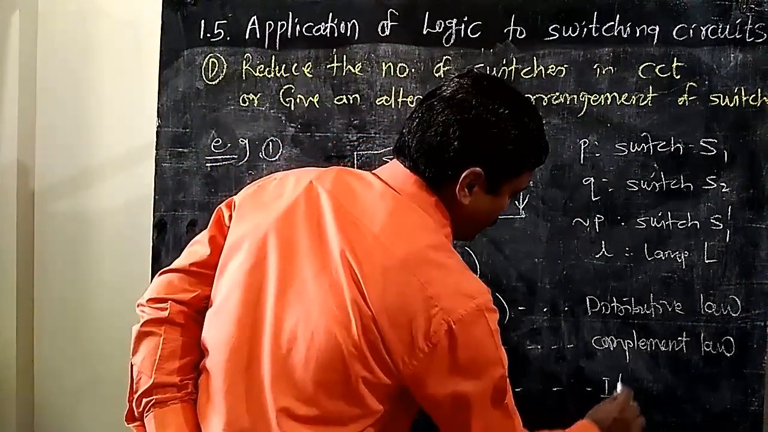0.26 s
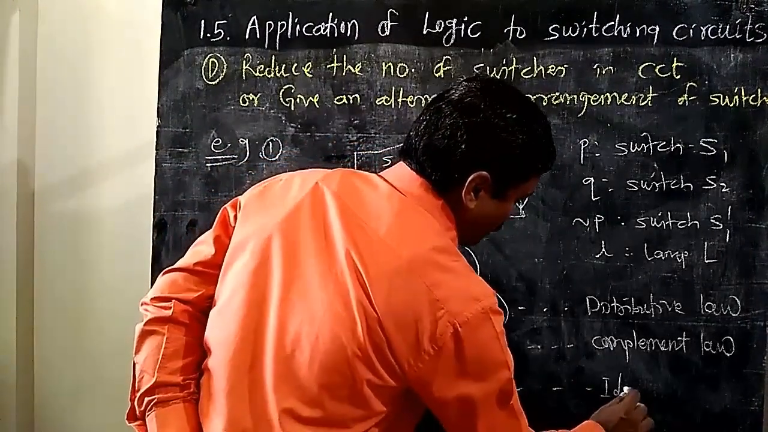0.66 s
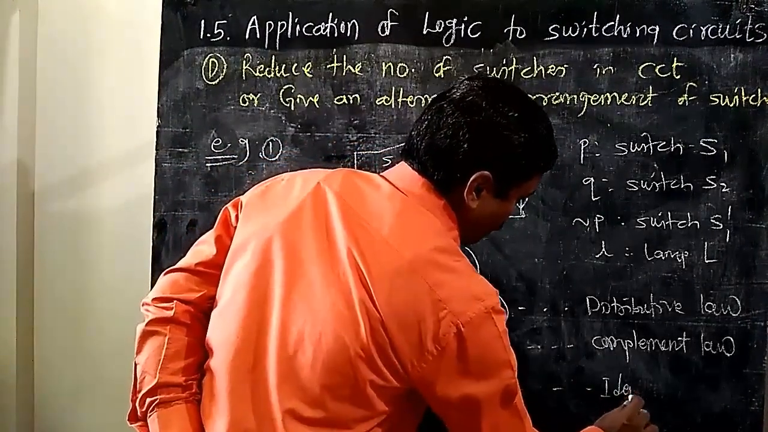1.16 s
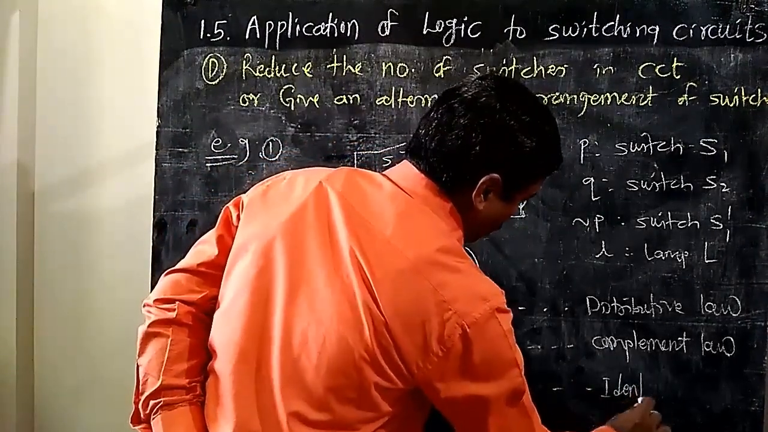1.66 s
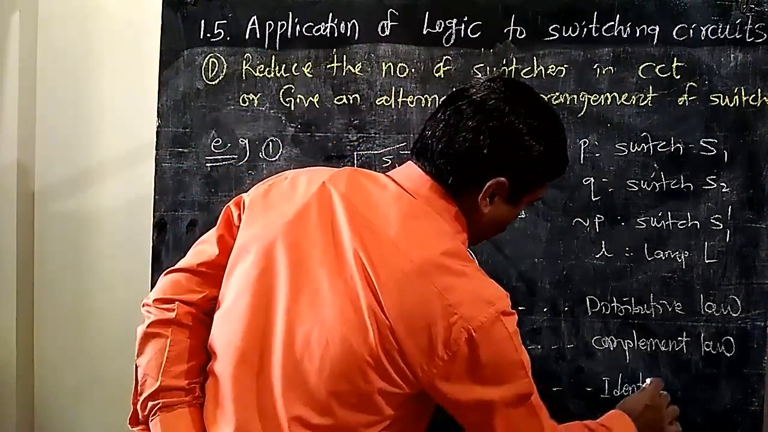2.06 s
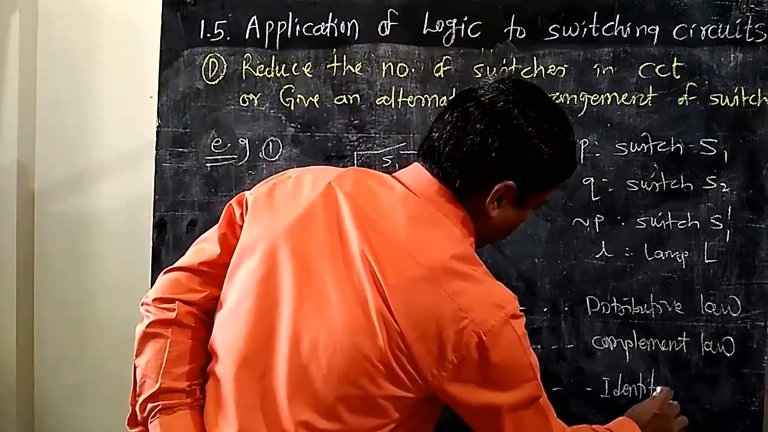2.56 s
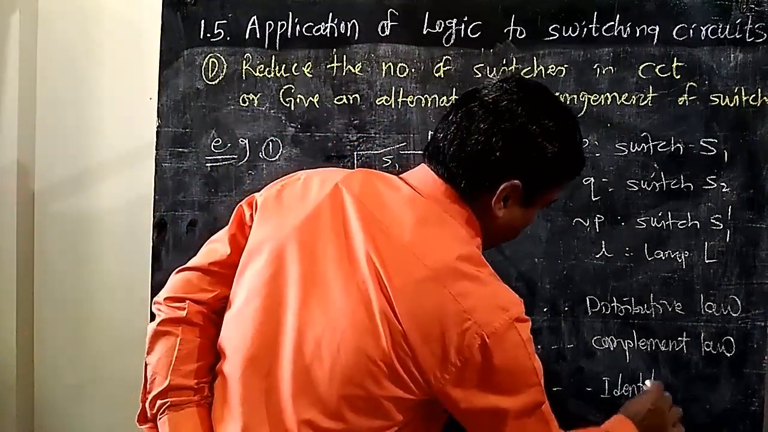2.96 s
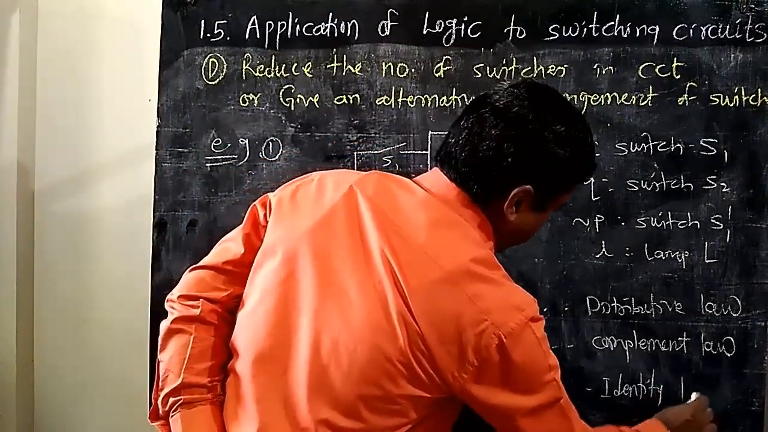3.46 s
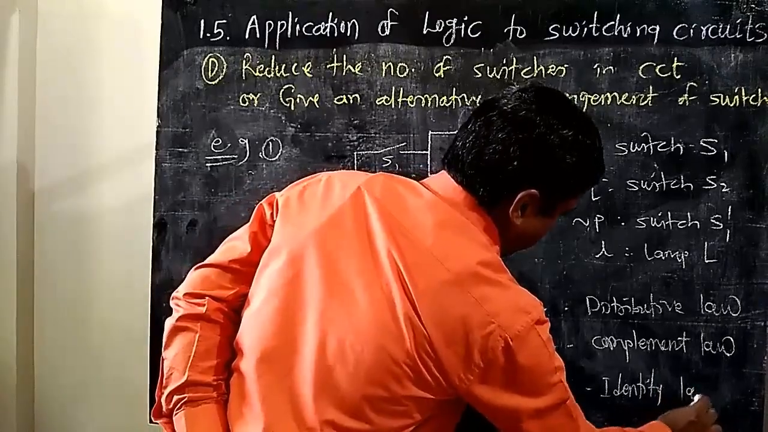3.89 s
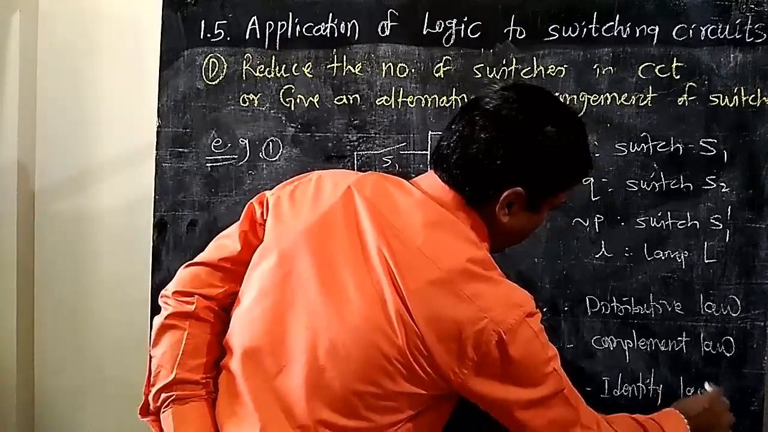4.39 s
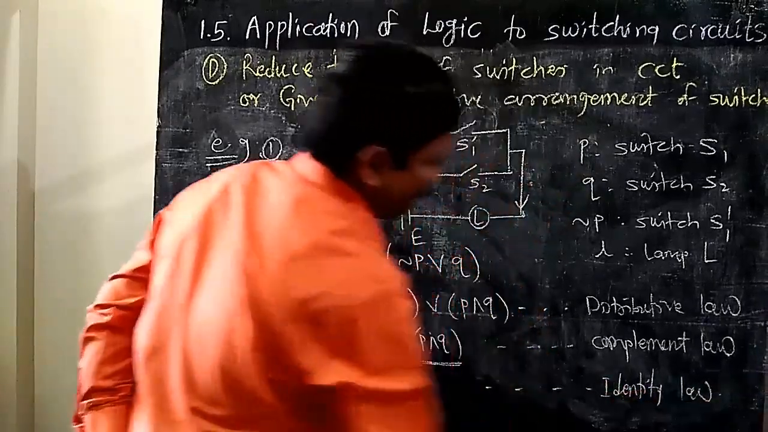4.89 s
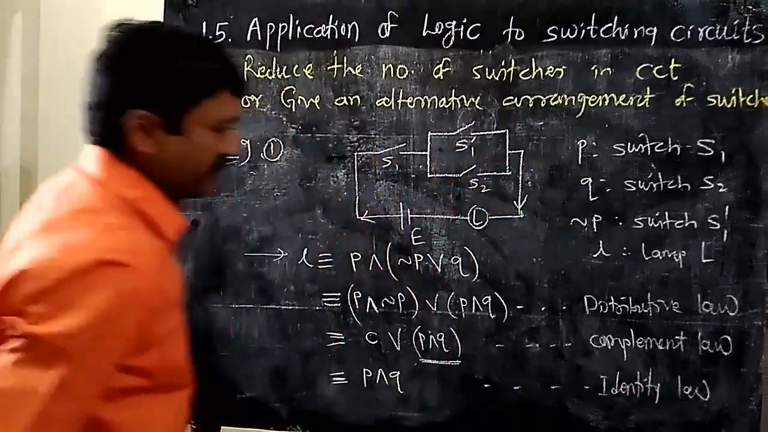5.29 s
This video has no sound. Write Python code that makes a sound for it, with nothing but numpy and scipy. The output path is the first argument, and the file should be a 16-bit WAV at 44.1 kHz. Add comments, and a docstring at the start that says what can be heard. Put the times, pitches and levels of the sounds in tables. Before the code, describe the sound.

In a bare classroom, chalk lands on a blackboard in uneven clusters of sharp taps, many followed by a brief scratchy drag. Between them come faint skims of chalk and the rub of a sleeve. Deep thumps from the flexing board join midway, ending in a quick group of booming knocks against the wall. The sound is mono, with shortened room echoes and faint hiss and electrical hum underneath.

```python
"""A bare, echoing classroom, where chalk writes a few letters on a hanging blackboard.
Each letter starts with a hard tap and a short gritty drag, as the tip sticks and slips.
The board sways under the hand, and knocks and booms against the wall, mostly near the end.
Light chalk glides and a brushing sleeve fill the gaps, over faint hiss and electrical hum.
The sound is mono, and a noise suppressor shortens the echoes."""
import sys
import numpy as np
from scipy import signal
from scipy.fft import irfft
from scipy.io import wavfile
from scipy.ndimage import uniform_filter1d

SR = 44100
rng = np.random.default_rng(int(sys.argv[2]) if len(sys.argv) > 2 else 0)


def wav_out(sig):
    """Save sig, one row per channel (or a flat mono array), as 16-bit PCM at SR to the path in sys.argv[1]."""
    wavfile.write(sys.argv[1], SR, np.round(np.clip(np.atleast_2d(sig).T, -1, 1) * 32767).astype(np.int16))


N = 244269
HZ = np.fft.rfftfreq(8192, 1 / SR)  # the frequencies at which filter curves are drawn
AGE = np.arange(SR * 3 // 4) / SR  # seconds since one short sound began


def gain_of(db):
    """Turns decibels into a factor to multiply by."""
    return 10 ** (np.asarray(db) / 20)


def unit_rms(x):
    """Scales a sound so that its average strength (rms) is 1."""
    return x / np.sqrt(np.mean(x ** 2) + 1e-20)


def at_level(x, db):
    """Scales a sound so that its loudest 50 ms has the level db."""
    return gain_of(db) * x / np.sqrt(uniform_filter1d(x ** 2, 2200).max() + 1e-20)


def curve(points, hz):
    """Joins a table's points to give a value at any frequency."""
    f, value = np.transpose(points)
    return np.interp(np.log(hz + 1), np.log(f + 1), value)


def bump(centre_hz, octaves):
    """A bell-shaped curve around one pitch."""
    return np.exp(-.5 * (np.log2((HZ + 1) / centre_hz) / octaves) ** 2)


def add(mix, s, sound):
    """Mixes a sound in, starting at s seconds."""
    start = round(s * SR)
    sound = sound[max(-start, 0):]
    part = mix[max(start, 0):][:len(sound)]
    part += sound[:len(part)]


def coloured(x, db):
    """Filters a sound by a curve in dB, so that it rings after a blow and never before."""
    log_gain = np.log(gain_of(np.r_[db, db[-2:0:-1]]))
    response = irfft(np.exp(np.conj(signal.hilbert(log_gain)))[:len(HZ)])
    return signal.fftconvolve(x, response[:len(HZ)])[:len(x)]


# The tone of the hiss, from low to high: f/Hz, relative level/dB
HISS_TONE = [(15, -65), (30, -46), (48, -10), (70, -29), (100, -16.5), (135, -9.5), (280, -17),
             (520, -14.5), (950, -13.5), (1400, -18), (3500, -23.5), (6200, -24), (9000, -37.5),
             (12200, -47), (13200, -81)]
def hiss(level_db=-59.5, flicker_db=-2.0):
    """Quiet noise that flickers a little, in small patches of pitch and time."""
    bands = signal.stft(rng.standard_normal(N), SR, nperseg=1024, noverlap=768)[2]
    patches = uniform_filter1d(rng.standard_normal(bands.shape), size=6, axis=0)
    patches = unit_rms(uniform_filter1d(patches, size=10, axis=1))
    noise = signal.istft(bands * gain_of(flicker_db * patches), SR, nperseg=1024, noverlap=768)[1][:N]
    return gain_of(level_db) * unit_rms(coloured(noise, curve(HISS_TONE, HZ)))


# The tones in the electrical hum: f/Hz, level/dB
HUM_TONES = [(50.3, -73.5), (100.5, -68.5), (201, -75), (302, -78.5)]
def hum():
    """Mains electricity hums with a low note and its overtones."""
    t = np.arange(N) / SR
    return sum(gain_of(db) * np.sqrt(2) * np.sin(2 * np.pi * (hz * t + rng.random()))
               for hz, db in HUM_TONES)


# How long the room rings: f/Hz, time to fade by 60 dB (t60)/s
ECHO_TIMES = [(100, .55), (400, 0.39), (1200, 0.43), (3000, 0.43), (4600, 0.33), (5400, 0.47), (7000, 0.45),
              (12000, 0.39)]
# The direct sound, shaded by the writer's body, then the nearest walls: delay/s, strength/ratio to echo
SOUND_PATHS = [(0.0003, 0.14), (0.0062, 0.3), (0.0085, 0.11), (0.017, 0.1), (0.026, 0.082), (0.035, 0.053)]
def room(walls, ring=1.0, firm=0.99, shared=0.42, build_s=0.0089):
    """The room's answer to a click on the board. All spots share the noise `walls`; the rest varies."""
    noise = shared * walls + np.sqrt(1 - shared ** 2) * rng.standard_normal(len(AGE))
    hz, t, bands = signal.stft(noise, SR, nperseg=256)
    fade = gain_of(-60 * t / (ring * curve(ECHO_TIMES, hz)[:, None]))
    echo = signal.istft(bands * fade, SR)[1][:len(AGE)]
    echo *= 1 - np.exp(-AGE * firm / build_s)
    echo /= np.linalg.norm(echo)
    for delay, share in SOUND_PATHS:
        # sound leaves the wide board from many points, which smears each arrival
        arrival = rng.standard_normal(len(AGE)) * np.exp(-AGE / .002)
        add(echo, delay, firm * share * arrival / np.linalg.norm(arrival))
    return echo


def rubbing(strokes, half_s, hz, spread_hz, climb_octaves=0):
    """Friction makes a soft band of noise that swells for half_s seconds, then fades as long."""
    out = np.zeros(N)
    progress = np.clip((AGE - AGE.mean()) / half_s, -1, 1)
    tone = np.cos(2 * np.pi * np.cumsum(hz * 2 ** (climb_octaves * progress)) / SR)
    swell = np.cos(np.pi * progress / 2) ** 4
    lowpass = signal.butter(3, spread_hz, fs=SR, output="sos")
    for s, db in strokes:
        grit = signal.sosfilt(lowpass, rng.standard_normal(len(AGE)))
        add(out, s - AGE.mean(), at_level(grit * tone * swell, db))
    return out


# Brushes of the sleeve: middle t/s, level/dB
SLEEVE_BRUSHES = [(1.25, -53), (3.05, -46.5), (3.897, -49)]
def sleeve():
    """Cloth rubs softly as the arm shifts."""
    return rubbing(SLEEVE_BRUSHES, half_s=0.24, hz=363, spread_hz=87)


# The hand leaning on the board: t/s, held for/s, level/dB
HAND_LEANS = [(2.2, .24, -45), (3.13, 0.54, -44.5), (4.56, 0.5, -48)]
# The tone of the bending board: f/Hz, relative level/dB
SWAY_TONE = [(15, -40), (35, 3), (60, 0.5), (110, 2), (170, -7), (240, -17.5), (500, -45), (2000, -86)]
def board_sway(rise_db_per_s=253, fall_db_per_s=176):
    """The board bends with a low rumble that builds as weight comes on and dies as it leaves."""
    t, pressure = np.arange(N) / SR, np.zeros(N)
    for s, held, db in HAND_LEANS:
        before, after = np.maximum(s - t, 0), np.maximum(t - s - held, 0)
        pressure += gain_of(db - rise_db_per_s * before - fall_db_per_s * after)
    return pressure * unit_rms(coloured(rng.standard_normal(N), curve(SWAY_TONE, HZ)))


# The board's own low notes: f/Hz, relative level/dB, time to fade by 60 dB (t60)/s
BOARD_NOTES = [(97, -4, 0.38), (164.7, 4.5, 0.27), (189.6, 6, 0.32), (323.4, -10, 0.72), (491, -5, 0.24),
               (650, -7.5, 0.38)]
def board_boom(rise_s=0.0051):
    """One push sets all the board's low notes ringing."""
    notes = sum(gain_of(db - 60 * AGE / fade_s) * np.sin(2 * np.pi * hz * AGE)
                for hz, db, fade_s in BOARD_NOTES)
    return notes * (1 - np.exp(-AGE / rise_s))


# Hard pushes on the board: middle t/s, level/dB, f/Hz
HARD_PUSHES = [(1.411, -50, 56), (2.189, -26, 65.5), (2.241, -29, 81), (2.375, -25.5, 89.6),
               (3.04, -39.5, 81), (3.183, -24.5, 66.3), (3.335, -31.5, 90.7), (3.504, -26, 88),
               (3.542, -27, 101), (3.599, -29, 69), (3.695, -40, 70.4), (4.559, -35.5, 77.5),
               (4.734, -30.5, 76), (5.066, -24, 74.1)]
def board_thumps(cycles=3.6, boom_db=-20):
    """The board gives way and swings back a few times, with a trace of its boom."""
    out, t = np.zeros(N), AGE - AGE.mean()
    for s, db, hz in HARD_PUSHES:
        length = cycles / hz
        swell = np.exp(-(4.86 * t / length) ** 2)
        swing = np.sin(2 * np.pi * (hz * t + rng.random()))
        add(out, s - AGE.mean(), gain_of(db) * swell * swing)
        add(out, s - length / 2, at_level(board_boom(), db + boom_db))
    return out


# The board hitting the wall: t/s, boom level/dB, rattle compared with the boom/dB
WALL_KNOCKS = [(1.735, -43.5, -2), (4.614, -49, -15), (4.680, -22.5, -6.5), (4.699, -28, -1),
               (4.774, -29, -29), (4.843, -27.5, -5.5), (4.874, -38.5, 5)]
# The tone of the frame's rattle: f/Hz, relative level/dB
RATTLE_TONE = [(40, -12), (150, 8), (300, 14), (700, 8), (1500, -8), (3000, -27), (7000, -74), (15000, -70)]
def board_knocks(walls, settle_s=0.0044):
    """The board booms as it meets the wall, and its frame settles with a dull rattle."""
    out = np.zeros(N)
    for s, db, rattle_db in WALL_KNOCKS:
        blow = room(walls) * (1 - np.exp(-AGE / settle_s))
        rattle = coloured(blow, curve(RATTLE_TONE, HZ))
        add(out, s, at_level(board_boom(), db) + at_level(rattle, db + rattle_db))
    return out


# Light strokes between the taps: middle t/s, level/dB
LIGHT_STROKES = [(1.029, -52.5), (1.503, -51), (2.995, -41.5), (4.002, -50), (4.481, -47.5)]
def chalk_glides():
    """The chalk skims the board, rising in pitch as the hand speeds up."""
    return rubbing(LIGHT_STROKES, half_s=.13, hz=4080, spread_hz=1020, climb_octaves=0.3)


# The overall tone of chalk on the board: f/Hz, relative level/dB
CHALK_TONE = [(30, -37.5), (100, -21), (170, -8), (250, -6.5), (400, -5.5), (750, -1.5), (1050, 2),
              (1320, 2), (1800, -2), (2900, -3.5), (4400, -0.5), (6500, -12), (10000, -37.5),
              (15000, -62.5)]
# Pitches at which the writing surface rings: f/Hz, width/Hz, boost/dB
SURFACE_NOTES = [(504, 32, 7), (631.8, 13.4, 6.5), (791, 69, 5), (918.5, 21, 5.5), (978, 8, 5.5),
                 (1042, 9.1, 6), (1265, 52, 3), (1333, 31, 5), (1395, 15, 3), (1507, 33, 3.5),
                 (2486, 16, 5), (2620, 9.9, 1.5), (3435, 31, 1.5), (4240, 14, 7.5)]
def chalk_colour(hollow_db, bite_db, sparkle_db):
    """The surface's tone in dB, shaped by how hard and sharp the chalk's edge meets it."""
    surface = sum(db / (1 + (2 * (HZ - hz) / width) ** 2) for hz, width, db in SURFACE_NOTES)
    hollow = hollow_db * bump(950, 0.93)
    bite = bite_db * bump(3180, 0.22)
    sparkle = sparkle_db / (1 + (6000 / (HZ + 1)) ** 4)
    return curve(CHALK_TONE, HZ) + surface + hollow + bite + sparkle


# The chalk dragging after a tap: t/s, level/dB, high sparkle/dB
CHALK_DRAGS = [(0.166, -33.5, -12), (0.336, -34.5, 13), (0.41, -45, 26), (1.745, -33, 7), (1.916, -35, 2),
               (2.201, -34.5, -8), (2.36, -28.5, 20), (3.236, -38, -12), (3.457, -42.5, -8)]
def chalk_drags(walls, drag_s=.029, slips_per_s=450, spread_db=4):
    """The tip sticks and slips, making a short run of uneven little blows."""
    out = np.zeros(N)
    for s, db, sparkle_db in CHALK_DRAGS:
        slipping = (rng.random(len(AGE)) < slips_per_s / SR) & (AGE < drag_s)
        strength = gain_of(spread_db * rng.standard_normal(len(AGE)))
        direction = np.sign(rng.standard_normal(len(AGE)))
        scrape = signal.fftconvolve(slipping * strength * direction, room(walls))[:len(AGE)]
        add(out, s, at_level(coloured(scrape, chalk_colour(0, 0, sparkle_db)), db))
    return out


# The chalk landing: t/s, level/dB, hollow board tone/dB, bite/dB, high sparkle/dB, firmness/factor,
# the chalk stick's own note f/Hz (it shifts with the grip), boost of that note/dB
CHALK_TAPS = [(-0.07, -27.5, 3, 4, -1, 1.04, 4000, 4.5), (0.124, -22, 5, 0.5, 14.5, 0.93, 3740, 9.5),
              (0.322, -23, 3, 1, 6, 0.61, 4240, 5), (1.668, -21, 0, -2.5, -1.5, .8, 3860, 5),
              (1.902, -25.5, 2.5, -3.5, 4, 0.66, 3140, 7), (2.192, -17.5, 1.5, 1.5, 8.5, 0.9, 4400, 1),
              (2.346, -18, -3, 1, 10, 0.81, 4600, 3.5), (2.610, -28.5, 6.5, -1, 1.5, .7, 4100, 5.5),
              (2.632, -31, 0, -5, -1, 1.54, 3840, 7), (3.148, -18.5, 0.5, 0, -1, 0.79, 3400, 3),
              (3.393, -24, 6.5, -4.5, 7, 0.48, 4500, -3.5), (3.642, -29.5, -0.5, 2, -49, 0.86, 2300, 6.5),
              (3.679, -32.5, -2.5, -15, -28.5, 1.3, 4000, 1), (4.424, -44, -2, -6, -3, 0.88, 2500, 15),
              (4.612, -19, 1, -7.5, -18, 0.82, 4600, 4.5), (4.693, -27, -13.5, -8, -15, 2.04, 4500, -8)]
def chalk_taps(walls, rebound_hz=1388, ripple_db=0.37):
    """Each landing is a sharp blow; the tip bounces within a millisecond, which ripples its tone."""
    out = np.zeros(N)
    ripple = ripple_db * np.cos(2 * np.pi * HZ / rebound_hz)
    for s, db, hollow_db, bite_db, sparkle_db, firm, stick_hz, stick_db in CHALK_TAPS:
        stick = stick_db * bump(stick_hz, octaves=0.082)
        colour = chalk_colour(hollow_db, bite_db, sparkle_db) + ripple + stick
        blow = room(walls, ring=0.97, firm=firm)
        add(out, s, at_level(coloured(blow, colour), db))
    return out


def scene():
    """Chalk, board and sleeve together, the same in both channels."""
    walls = rng.standard_normal(len(AGE))
    chalk = chalk_taps(walls) + chalk_drags(walls)
    board = board_knocks(walls) + board_thumps() + board_sway()
    return np.array([chalk + board + chalk_glides() + sleeve()] * 2)


def suppress(x, low_hz, threshold_db, depth_db, top_hz=5200, softness_db=1.3):
    """A noise suppressor turns a band of pitches down whenever it sinks below the threshold."""
    band = signal.sosfiltfilt(signal.butter(6, [low_hz, top_hz], "band", fs=SR, output="sos"), x)
    power = uniform_filter1d((band ** 2).mean(0), 900)
    level_db = 10 * np.log10(abs(power) + 1e-12)
    shut = .5 - .5 * np.tanh((level_db - threshold_db) / (2 * softness_db))
    return x + band * (gain_of(-depth_db * shut) - 1)


def record(dry):
    """Shortens the echoes in two steps, adds hiss and hum, and cuts the treble above 15 kHz."""
    heard = suppress(dry, low_hz=227, threshold_db=-32, depth_db=7.0)
    heard = suppress(heard, low_hz=129.5, threshold_db=-46, depth_db=5.0)
    heard = heard + hiss() + hum()
    lowpass = signal.firwin(511, 15000, window=("kaiser", 9), fs=SR)
    return signal.oaconvolve(heard, lowpass[None], "same")


dry = scene()
out = record(dry)
wav_out(out)
```